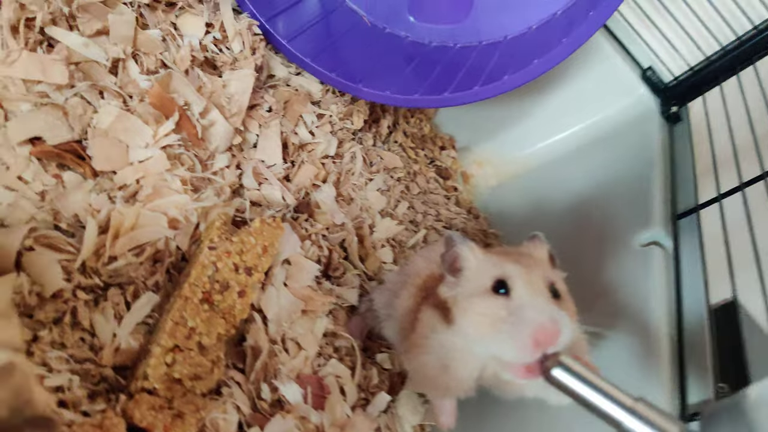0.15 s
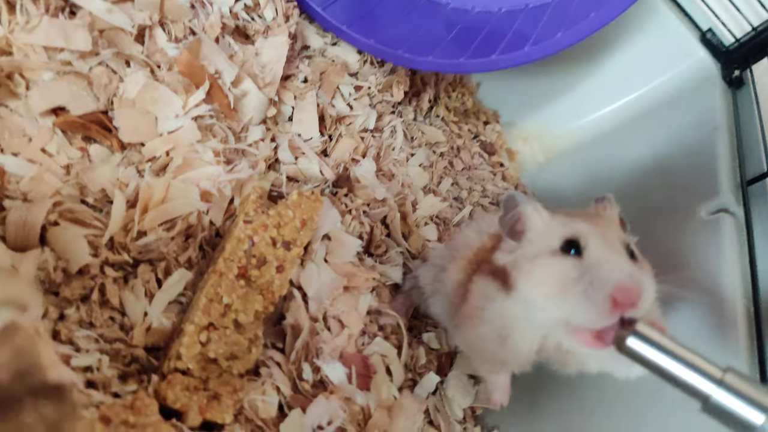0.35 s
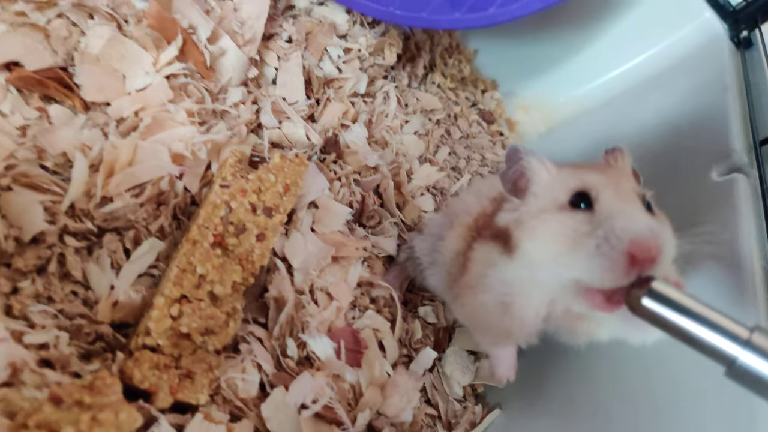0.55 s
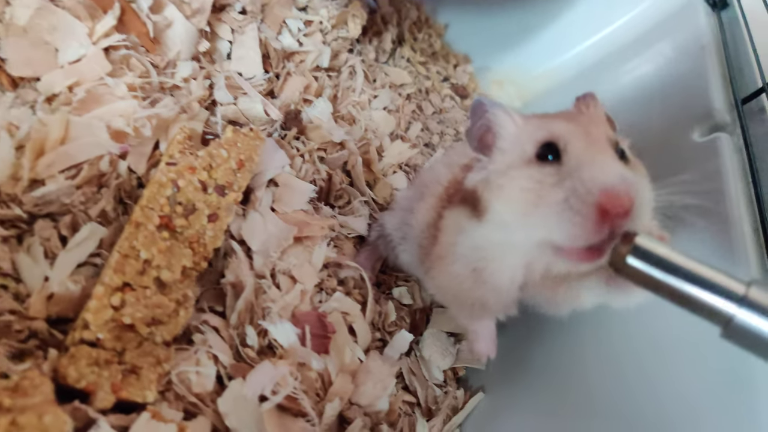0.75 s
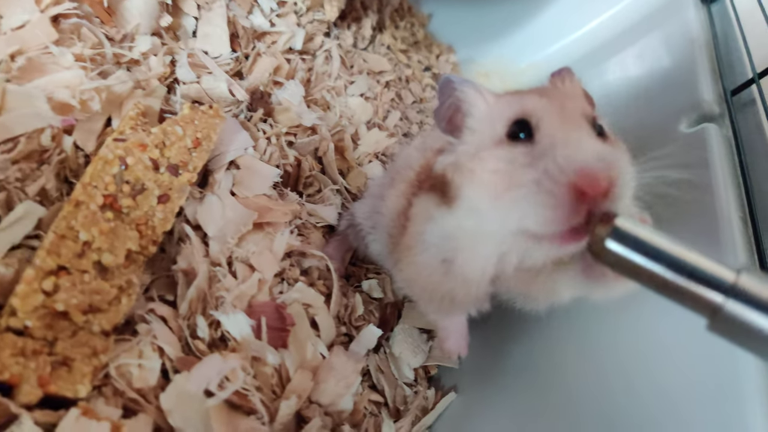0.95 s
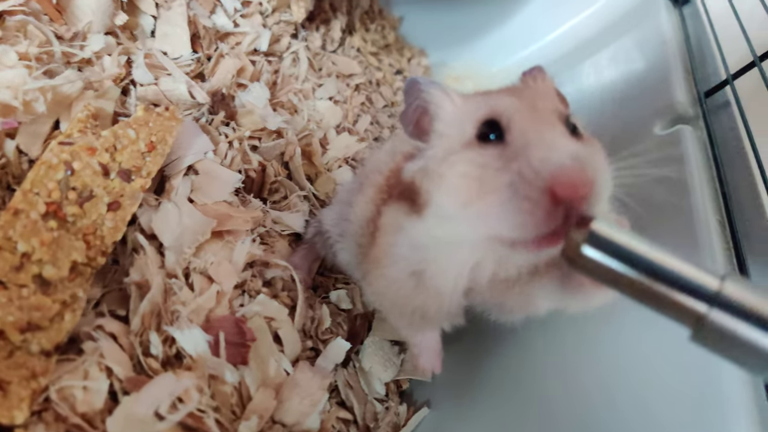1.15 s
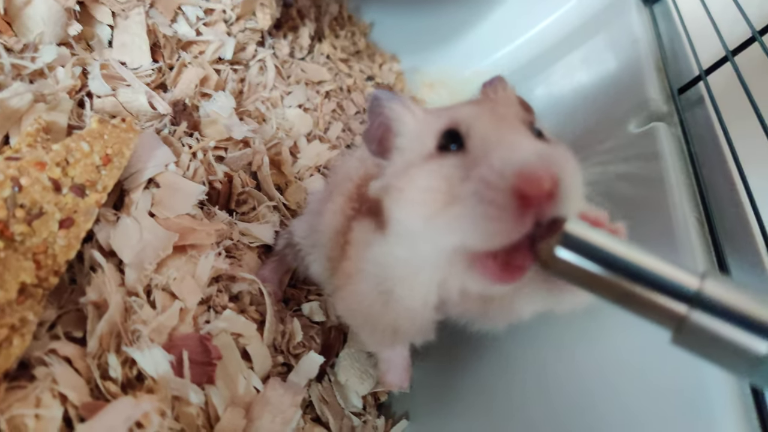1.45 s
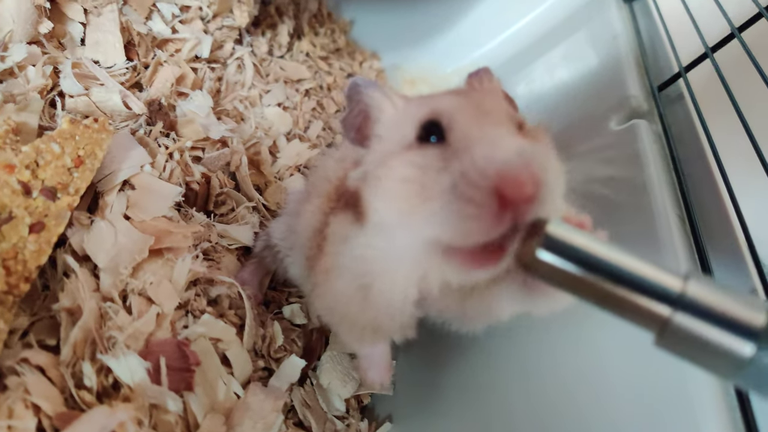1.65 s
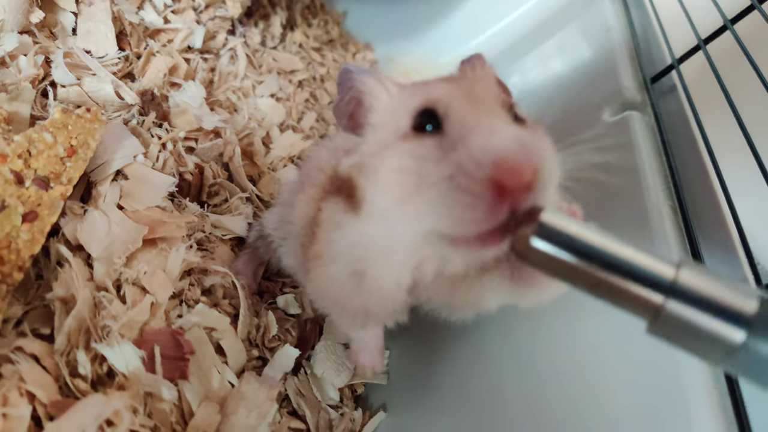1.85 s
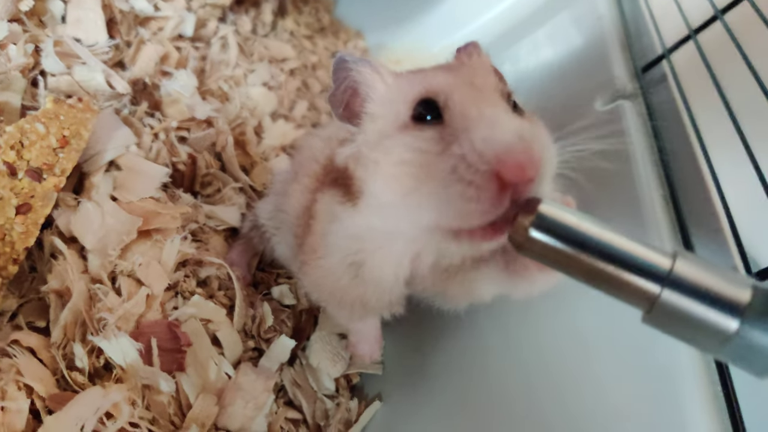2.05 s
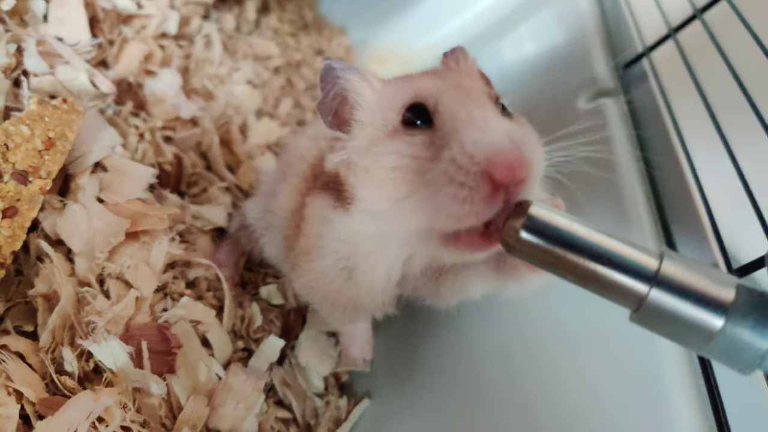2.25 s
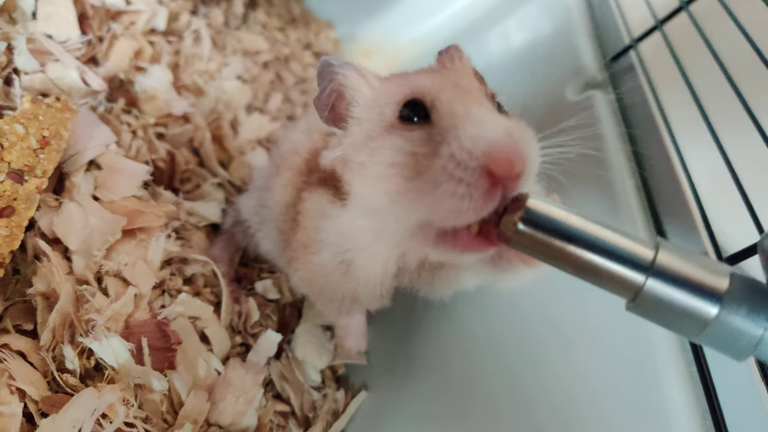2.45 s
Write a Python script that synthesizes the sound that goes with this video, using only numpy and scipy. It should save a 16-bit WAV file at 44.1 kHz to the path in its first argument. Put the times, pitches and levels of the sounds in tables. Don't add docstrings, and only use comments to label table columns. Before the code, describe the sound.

Two hard metallic knocks of a hamster's bottle spout, then quick tiny licking ticks, quiet room

```python
import sys
import numpy as np
from scipy import signal
from scipy.fft import rfft, irfft
from scipy.io import wavfile
from scipy.ndimage import uniform_filter1d

SR = 44100
rng = np.random.default_rng(int(sys.argv[2]) if len(sys.argv) > 2 else 0)


def gain_from_db(level_db):
    decades = np.asarray(level_db, float) / 20
    return 10 ** decades


def transcribe(u):
    v = np.clip(np.atleast_2d(u).T, -1, 1)
    q = np.round(v * 32767).astype(np.int16)
    wavfile.write(sys.argv[1], SR, q)


N = 114660


def evened(x):
    return x / np.sqrt(np.mean(x ** 2, axis=-1, keepdims=True) + 1e-20)


def read(points, hz):
    f, value = np.transpose(points)
    return np.interp(np.log(hz + 1), np.log(f + 1), value)


def follow(points):
    return gain_from_db(np.interp(np.arange(N) / SR, *np.transpose(points)))


def lowpassed(x, order, cutoff_hz):
    return signal.lfilter(*signal.butter(order, cutoff_hz, fs=SR), x)


LEFT_LAG_S = 0.00052


def add(mix, start_s, sound, pan_db):
    for row, lag_s, gain_db in zip(mix, (LEFT_LAG_S, 0), (pan_db / 2, -pan_db / 2)):
        part = row[round((start_s + lag_s) * SR):][:len(sound)]
        part += gain_from_db(gain_db) * sound[:len(part)]


def wash(left, right, same, patchy_db, size=1024):
    frames = 4 * N // size + 5
    hz = np.fft.rfftfreq(size, 1 / SR)
    a, b, c, d, patches = rng.standard_normal((frames, len(hz), 5)).T
    patches = uniform_filter1d(patches, size=size // 100, axis=0)
    patches = uniform_filter1d(patches, size=10240 // size, axis=1)
    like = np.clip(read(same, hz), -1, 1)[:, None]
    first = a + 1j * b
    second = like * first + np.sqrt(1 - like ** 2) * (c + 1j * d)
    colour_db = np.array([left(hz), right(hz)])[..., None]
    z = np.array([first, second]) * gain_from_db(colour_db + patchy_db * patches / patches.std())
    return signal.istft(z, nperseg=size, noverlap=3 * size // 4)[1][:, :N]


SPOUT_HZ = [1080, 2050, 2250, 2650, 3320, 4040, 4200, 4740, 6600, 9600, 10100, 13400]
# knock1_db, knock2_db, t60_s, left_right_db
SPOUT_MODES = [(3.5, -5, 0.012, -12.5), (-14.5, -18.5, 0.1, -8), (0.5, -2, 0.0092, -13.5),
               (-18, -16, 0.011, -9), (-27, -21, 0.037, 12), (-10, -15, 0.056, -18), (-14, -13, 0.041, -1),
               (-32, -8, .03, 4), (-8, -6.5, 0.062, -7), (-19, -16, 0.024, 0), (-22, -5.5, .007, -9.5),
               (-24, -10, 0.015, -7)]
STRIKE_GAIN, STRIKE_S = 1.11, 0.0011


def spout(steel, k, start_s, level_db, cut_hz, t):
    strike = 1 + STRIKE_GAIN * np.exp(-t / STRIKE_S)
    for hz, (*db, t60_s, pan_db) in zip(SPOUT_HZ, SPOUT_MODES):
        ring = strike * gain_from_db(level_db + db[k] - 60 * t / t60_s) * np.sin(2 * np.pi * hz * t) / 2
        add(steel, start_s, lowpassed(ring, 3, cut_hz), pan_db)


# pitch_hz, knock1_db, knock2_db, t60_s, left_right_db
TRAY_MODES = [(57.6, -2, 1.5, 0.32, 25), (99.7, -13, 5, 0.29, 13.5), (138.4, 2, 2.5, 0.23, 20.5),
              (339.5, -4, -9.5, 0.19, 21), (387, 11, 6.5, 0.051, 7.5), (692, -18, -16, 1, 13.5),
              (484, 2.5, -2, 0.066, -7), (558, -13, 5.5, 0.043, 12.5), (763, -5, -3, 0.15, 10.5),
              (912, -21, 9.5, 0.028, -15.5), (1150, -21, 8, 0.02, 15)]
TRAY_RISE_S = 0.0058


def tray(out, k, start_s, boom_db, t):
    for hz, *db, t60_s, pan_db in TRAY_MODES:
        rise = 1 - np.exp(-t * hz / (100 * TRAY_RISE_S))
        tone = np.sin(2 * np.pi * (hz * t + rng.random()))
        add(out, start_s, rise * gain_from_db(boom_db + db[k] - 60 * t / t60_s) * tone, pan_db)


RATTLE_DB, RATTLE_HZ, RATTLE_T60_S = -20.5, 6000, 0.17
THUD_DB, THUD_HZ, THUD_T60_S, THUD_RISE_S = -4, 530, 0.44, 0.0017


def rattle_and_thud(out, start_s, level_db, cut_hz, boom_db, t):
    for side_db in (-12, 12):
        air = lowpassed(rng.standard_normal(len(t)), 2, RATTLE_HZ)
        rattle = air * gain_from_db(level_db + RATTLE_DB - 60 * t / RATTLE_T60_S)
        add(out, start_s, lowpassed(rattle, 3, cut_hz), side_db - 4)
        thud = evened(lowpassed(rng.standard_normal(len(t)), 2, THUD_HZ))
        thud *= np.minimum(t / THUD_RISE_S, 1) * gain_from_db(boom_db + THUD_DB - 60 * t / THUD_T60_S)
        add(out, start_s, thud, side_db + 3)


CRACK_DB, CRACK_S = -23, 0.00046


def crack(out, start_s, level_db, cut_hz, t):
    noise = rng.standard_normal(len(t)) * gain_from_db(level_db + CRACK_DB) * np.exp(-t / CRACK_S)
    add(out, start_s, lowpassed(noise, 3, cut_hz), -8)


ECHO_DB, ECHO_S = -11, 0.006


def cage(x):
    taps = np.zeros((2, 700))
    at = np.arange(40, 680, 40) + rng.integers(0, 40, (2, 16))
    echoes = rng.choice([-1., 1.], at.shape) * gain_from_db(ECHO_DB) * np.exp(-at / SR / ECHO_S)
    np.put_along_axis(taps, at, echoes, 1)
    return x + signal.oaconvolve(x, taps, axes=1)[:, :N]


# start_s, level_db, contact_cutoff_hz, tray_boom_db
KNOCKS = [
    (1.4943, -33, 5090, -46),
    (1.5786, -29, 16700, -42),
]


def knocks():
    steel, out = np.zeros((2, N)), np.zeros((2, N))
    t = np.arange(SR // 2) / SR
    for k, (start_s, level_db, contact_hz, boom_db) in enumerate(KNOCKS):
        cut_hz = min(contact_hz, 16000)
        spout(steel, k, start_s, level_db, cut_hz, t)
        tray(out, k, start_s, boom_db, t)
        rattle_and_thud(out, start_s, level_db, cut_hz, boom_db, t)
        crack(out, start_s, level_db, cut_hz, t)
    return out + cage(steel)


def bursts(rows, spread, width_hz, grit_db):
    out = np.zeros((2, N))
    t, f = np.arange(8192) / SR, np.fft.rfftfreq(8192, 1 / SR)
    for start_s, level_db, hz, length_s, pan_db in rows:
        grit = gain_from_db(grit_db * np.repeat(rng.exponential(1, 512), 16))
        band = np.exp(-0.5 * ((f - hz) / (spread * hz + width_hz)) ** 2)
        air = irfft(rfft(rng.standard_normal(8192)) * band)
        shape = np.sin(np.pi * np.clip(t / (1.4 * length_s), 0, 1) ** 0.6)
        add(out, start_s, gain_from_db(level_db) * evened(air) * grit * shape, pan_db)
    return out


TICK_S = [.831, .8325, .985, 1.19, 1.295, 1.437, 1.5, 1.74, 1.795, 1.812, 1.842, 1.899, 1.9241, 1.93, 1.936,
          1.942, 1.956, 1.998, 2.021, 2.047, 2.065, 2.076, 2.088, 2.11, 2.27, 2.535, 2.591]
# level_db, centre_hz, length_s, left_right_db
TICKS = [(-62, 8700, .004, 4), (-65, 4700, 0.0064, 0), (-64, 4700, .004, 0), (-61.5, 5500, 0.0045, -6),
         (-65, 8050, .017, -15), (-70, 7300, .004, 2), (-58.5, 7200, 0.081, -4), (-60, 8100, 0.13, -8),
         (-55.5, 6100, .012, -9), (-52.5, 7000, 0.0047, -8), (-58, 5200, 0.0063, 10),
         (-63, 10200, 0.0017, -8), (-43, 8500, 0.0021, -18), (-64.5, 6900, 0.14, -18),
         (-55, 10700, 0.00072, -24), (-49, 5100, 0.0028, -18), (-52.5, 7300, .022, -9.5),
         (-56, 11000, .003, -6), (-55, 9500, 0.0033, -10), (-60, 5700, .002, -3), (-51, 6900, 0.0035, -1),
         (-54, 6900, 0.017, -12), (-66, 7300, 0.072, -17), (-61, 5300, 0.0028, -4), (-56, 8600, 0.0043, -9),
         (-58.5, 5200, 0.0042, 10), (-58, 8600, 0.004, -1)]


def tongue():
    rows = [(start_s, *row) for start_s, row in zip(TICK_S, TICKS)]
    return bursts(rows, spread=0.45, width_hz=0, grit_db=0.5)


# start_s, level_db, ring_hz, length_s, left_right_db
BALL = [(0.657, -64, 4540, 0.011, 11), (1.373, -71, 4570, 0.017, -1), (1.6, -73, 3780, 0.086, -18),
        (1.755, -69, 4070, 0.025, -14), (1.78, -62.5, 4350, 0.018, -5), (1.8, -60, 4530, 0.028, -5),
        (1.84, -59, 4600, 0.011, 7), (2.017, -70, 4700, 0.017, 11), (0.8344, -56.5, 2900, 0.0076, 3.5),
        (0.829, -61, 2400, 0.0094, -6), (2.12, -71, 5000, 0.06, -14), (2.258, -68, 4600, .015, 5),
        (2.475, -70, 4500, 0.02, 10), (2.522, -66, 4550, 0.026, 1)]


def ball():
    return bursts(BALL, spread=0, width_hz=240, grit_db=1.)


# pitch_hz, gain_db
NEAR_LEFT = [(2000, 0.5), (5000, -3), (7000, -15), (9000, -9), (16000, -11)]
NEAR_RIGHT = [(2000, -6.5), (6000, -6.5), (7400, -9.5), (8700, -22.5), (11500, -3), (13500, -10),
              (16000, -19)]


def licking():
    hz = np.fft.rfftfreq(N, 1 / SR)
    colour = gain_from_db(np.array([read(NEAR_LEFT, hz), read(NEAR_RIGHT, hz)]))
    return irfft(rfft(tongue() + ball()) * colour, N)


# time_s, level_db
SLEEVE_MOVE = [(.08, -5.5), (.22, -5.5), (.35, -3), (.5, 0.5), (.62, -4.5), (.8, -8), (1, -14), (1.2, -44)]
# pitch_hz, density_db_per_hz
SLEEVE_LEFT = [(300, -23.5), (900, 0.5), (2000, -14.5), (4500, -14.5), (7000, -19.5), (8500, -23),
               (12000, -20.5), (16000, -20)]
SLEEVE_RIGHT = [(300, -28), (900, -12), (2000, -8), (5800, -9), (7100, -0.5), (8200, -25), (11500, -13.5),
                (16000, -24)]
SLEEVE_DB = [-56.5, -59]


def sleeve():
    x = wash(lambda hz: read(SLEEVE_LEFT, hz), lambda hz: read(SLEEVE_RIGHT, hz),
             [(100, 0), (200, 0)], patchy_db=1.5)
    return gain_from_db(np.c_[SLEEVE_DB]) * evened(x) * follow(SLEEVE_MOVE)


PUSH_DB = [-26, -44]
SWAY_DB = [-52, -49]
SAG_DB = [-49, -66]
PUSH_S, PUSH_LENGTH_S, SWAY_HZ = 0.19, 0.37, 3.5


def hand():
    u = np.clip((np.arange(N) / SR - PUSH_S) / PUSH_LENGTH_S, 0, 1)
    push = gain_from_db(np.c_[PUSH_DB]) * np.sin(np.pi * u ** 0.66) ** 1.2
    drift = signal.lfilter([1], [1, -0.9998], rng.standard_normal((2, N)))
    slow = lowpassed(drift, 3, SWAY_HZ)
    sway = gain_from_db(np.c_[SWAY_DB]) * evened(slow - slow.mean(1, keepdims=True))
    return push + (sway - gain_from_db(np.c_[SAG_DB])) * np.minimum(10 * u, 1)


# start_s, level_db, pitch_hz, length_s, left_right_db
DRONES = [(.12, -52.5, 86, .55, 5), (.08, -58.5, 213, 1, 7.5), (0.11, -55, 210, 0.2, 8),
          (0.61, -60.5, 264.4, 0.38, 11.5), (.6, -62.5, 73, 0.28, 6), (.95, -64, 200, 0.48, 6),
          (1.65, -53, 67, 0.337, -3), (1.658, -57, 444, 0.32, 9.5), (2.15, -52, 84, 0.71, 1.5),
          (2.199, -54, 57, 0.4, 4), (2.2, -61.5, 274, 0.36, 10.5), (2.15, -62, 246, 0.28, 13),
          (0.213, -77, 520, 0.47, 0), (2.116, -72, 1000, 0.56, -9)]


def drones():
    out = np.zeros((2, N))
    for start_s, level_db, hz, length_s, pan_db in DRONES:
        t = np.arange(0, length_s, 1 / SR)
        wander = rng.standard_normal((2, 40))
        pitch, size = np.array([np.interp(t, np.arange(40) / 25, row) for row in wander])
        tone = np.sin(2 * np.pi * np.cumsum(hz * (1 + 0.02 * pitch)) / SR)
        swell = np.sin(np.pi * t / length_s) ** 0.93
        add(out, start_s, gain_from_db(level_db + 0.83 * size) * tone * swell, pan_db)
    return out


# pitch_hz, density_db_per_hz
ROOM = [(24, 3.5), (40, -7.5), (73, -4.5), (190, -7.5), (231, -8.5), (269, -11), (412, -14), (1170, -16),
        (4000, -31.5), (5200, -41), (8800, -120)]
# pitch_hz, width_hz, gain_db
HUMS = [(71.8, 8.2, 3), (199, 2.2, 4), (278.4, 13.6, 2.5), (880, 21, 4.5), (1520, 214, 2)]
# pitch_hz, likeness
ROOM_SAME = [(60, 0.25), (180, 0.94), (550, 0.093), (1650, -0.15), (4970, 0.5), (15000, 0.01)]
# pitch_hz, left_right_db
ROOM_PAN = [(60, 0), (180, 11.5), (550, 0), (1650, 2.5), (4970, -10.5), (15000, 8)]
# time_s, level_db
ROOM_SWELL = [(0, -0.5), (.12, 0), (.2, 3), (.35, 8), (.6, 3.5), (.78, 2.5), (1, 2), (1.4, 2), (1.7, 7),
              (1.95, 6), (2.2, 3.5), (2.6, 4.5)]
ROOM_DB = -55


def room():
    def colour(hz):
        tones = sum(db / (1 + ((hz - f) / w) ** 2) for f, w, db in HUMS)
        return read(ROOM, hz) - hz / 400 + tones
    x = wash(lambda hz: colour(hz) + read(ROOM_PAN, hz) / 2,
             lambda hz: colour(hz) - read(ROOM_PAN, hz) / 2, ROOM_SAME, patchy_db=1.5, size=4096)
    return gain_from_db(ROOM_DB) * follow(ROOM_SWELL) * x / x.std()


# pitch_hz, density_db_per_hz
HISS_LEFT = [(500, -22), (2000, 13.5), (6000, 8), (9000, 9.5), (12000, 12), (16000, 17)]
HISS_RIGHT = [(500, 1.5), (2000, -11.5), (5000, 1.5), (7400, -2.5), (8600, -6), (11000, 0.5), (13000, -0.5),
              (16000, 1.5)]
HISS_DB = [-64.5, -68]


def hiss():
    x = wash(lambda hz: read(HISS_LEFT, hz), lambda hz: read(HISS_RIGHT, hz),
             [(100, 0.0089), (200, 0.0)], patchy_db=-1.5)
    return gain_from_db(np.c_[HISS_DB]) * evened(x)


def scene():
    edge = signal.firwin(1023, 15780, fs=SR)[None]
    steady = sleeve() + hand() + drones() + room() + hiss()
    return knocks() + licking() + signal.oaconvolve(steady, edge, "same")


def roll_off(x):
    return signal.sosfilt(signal.butter(12, 16490, fs=SR, output="sos"), x)


OPEN_S, OPEN_FROM_DB, OPEN_TAKES_S = 0.0385, -8.5, 0.19
POP_DB, POP_HZ, POP_T60_S = -56, 210, 0.041


def record(dry):
    t = np.arange(N) / SR - OPEN_S
    opening = (t > 0) * gain_from_db(OPEN_FROM_DB * np.clip(1 - t / OPEN_TAKES_S, 0, 1))
    pop = (t > 0) * gain_from_db(POP_DB - 60 * abs(t) / POP_T60_S) * np.sin(2 * np.pi * POP_HZ * t)
    return roll_off(dry * opening + pop)


dry = scene()
out = record(dry)
transcribe(out)
```